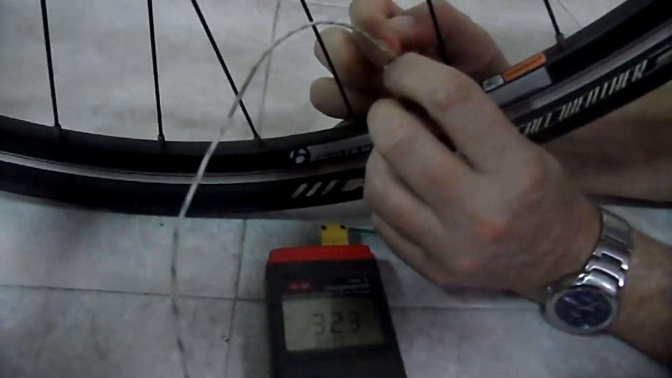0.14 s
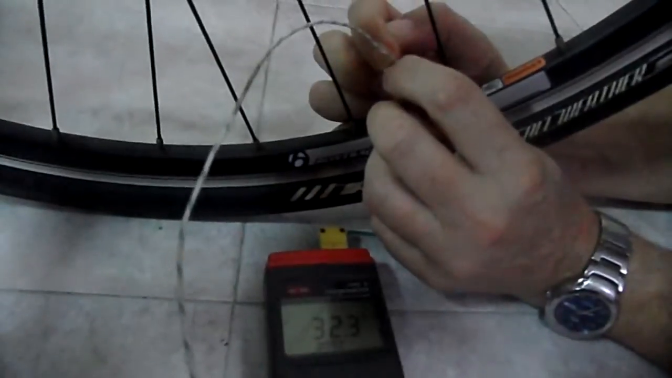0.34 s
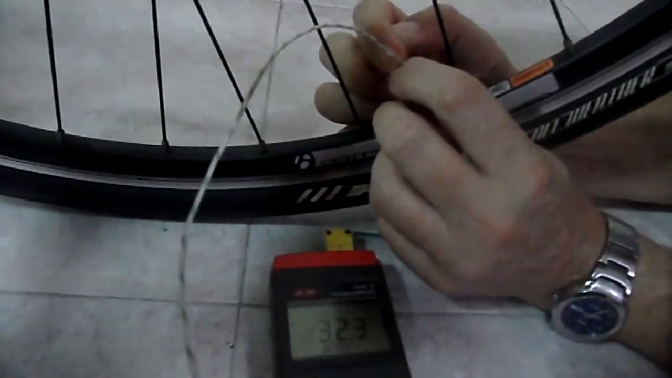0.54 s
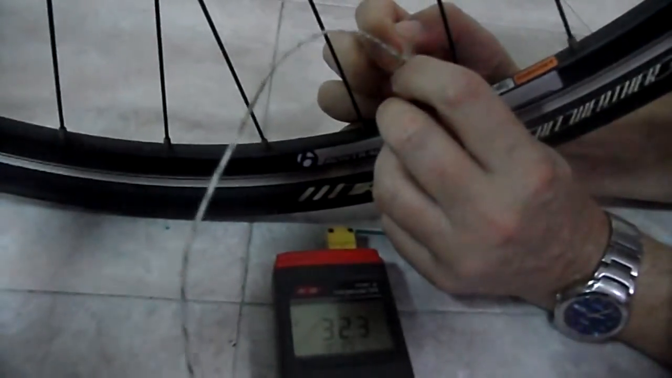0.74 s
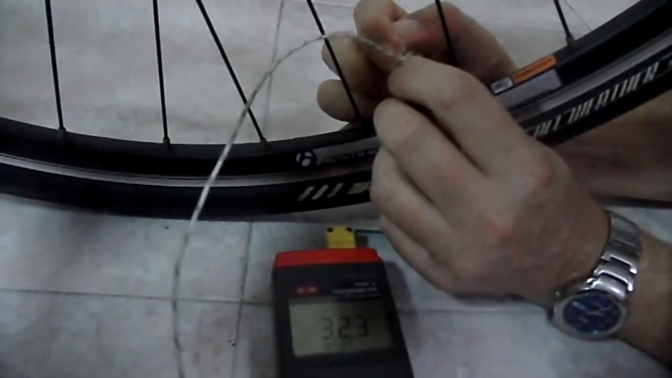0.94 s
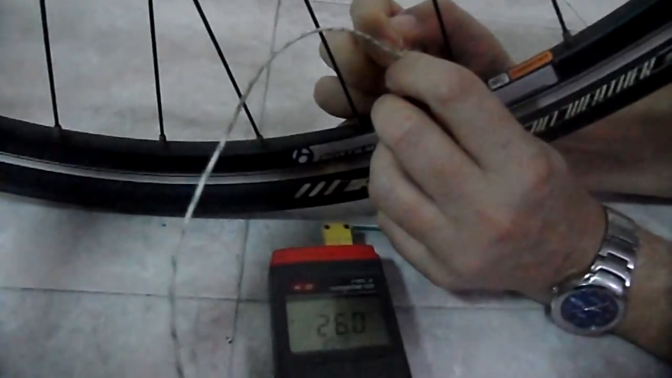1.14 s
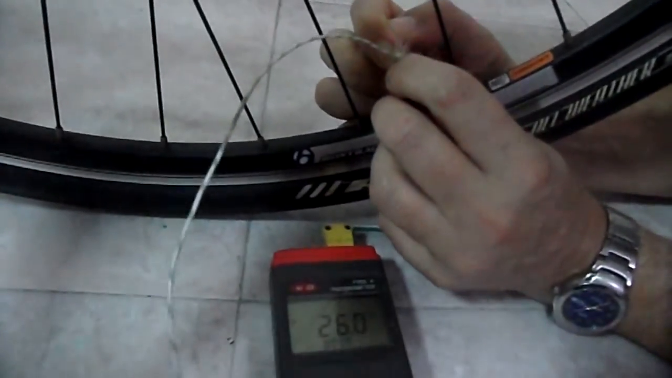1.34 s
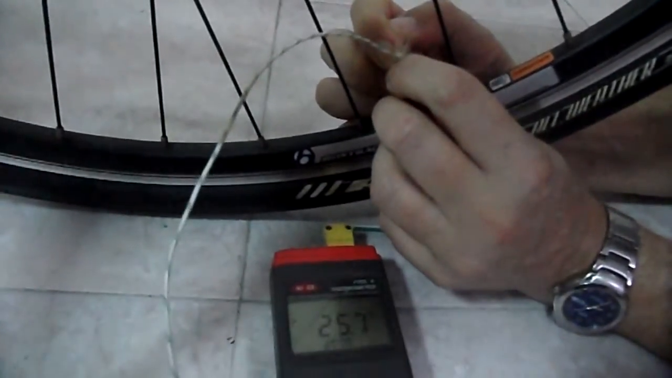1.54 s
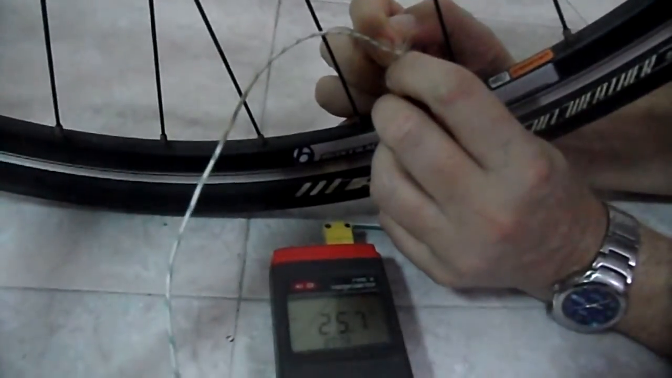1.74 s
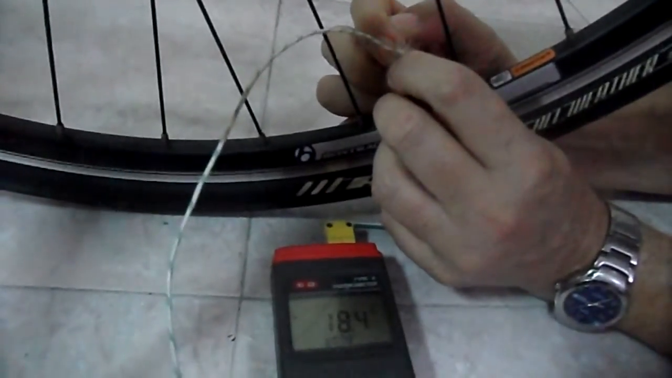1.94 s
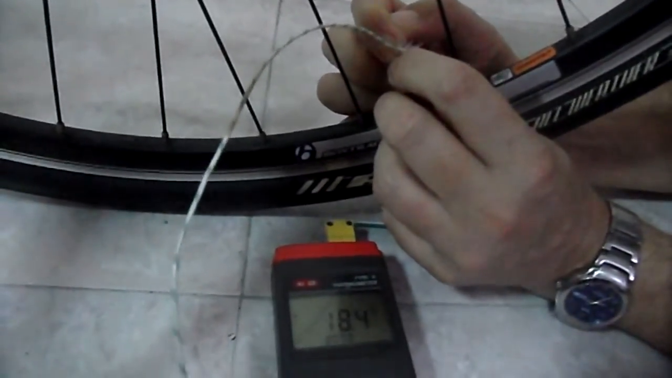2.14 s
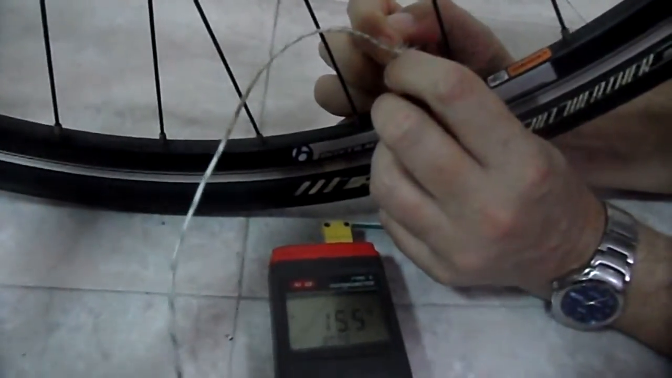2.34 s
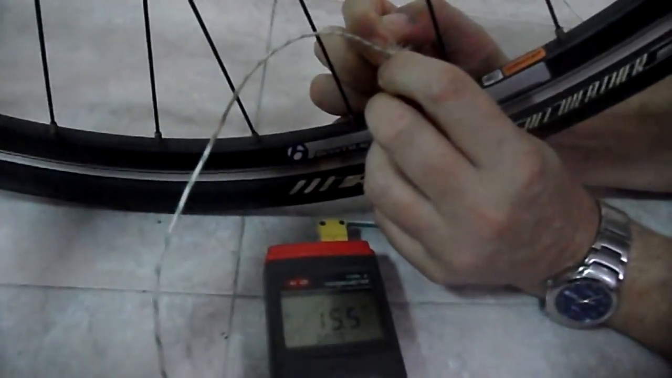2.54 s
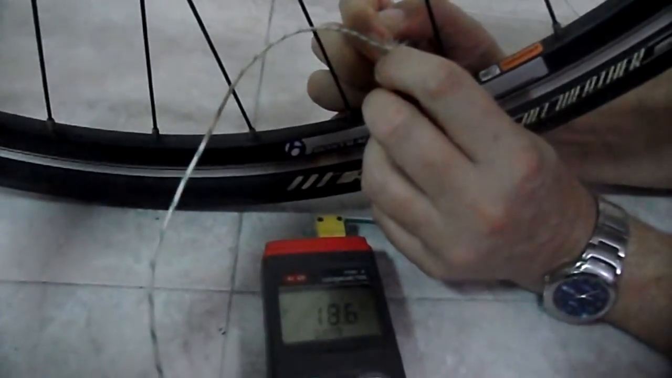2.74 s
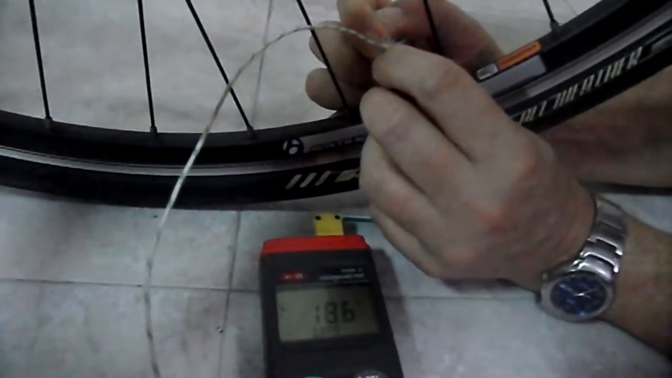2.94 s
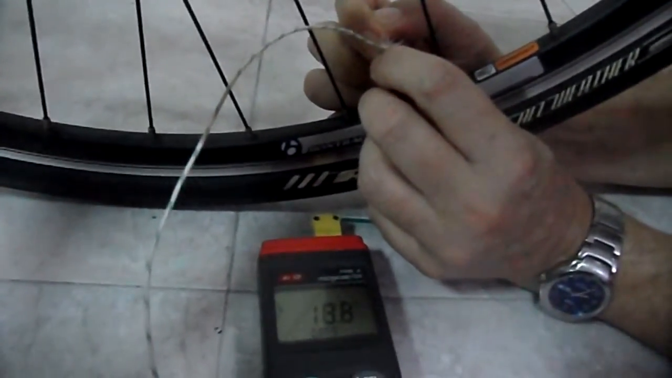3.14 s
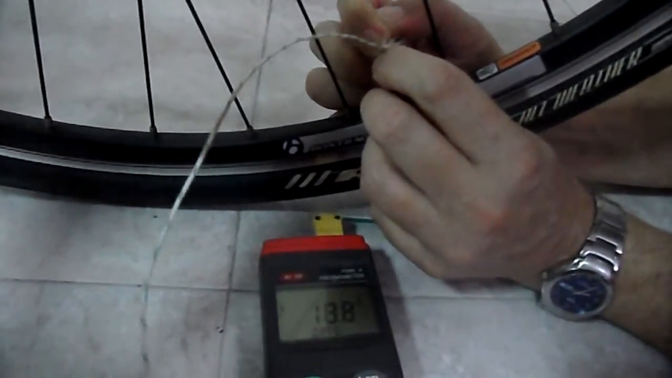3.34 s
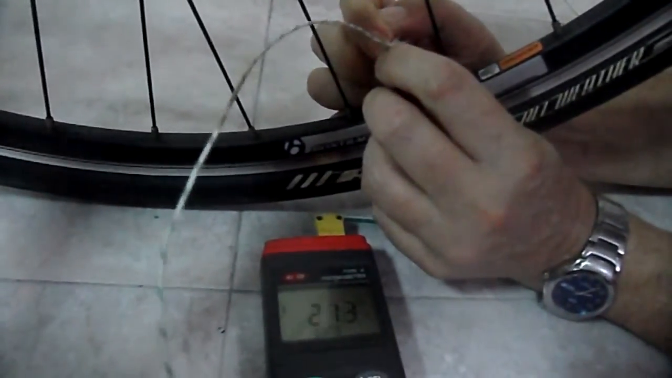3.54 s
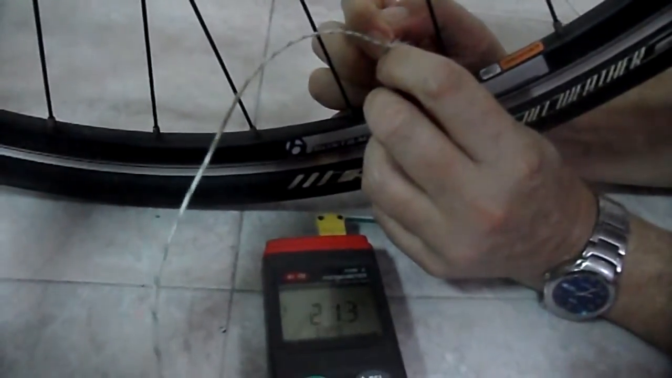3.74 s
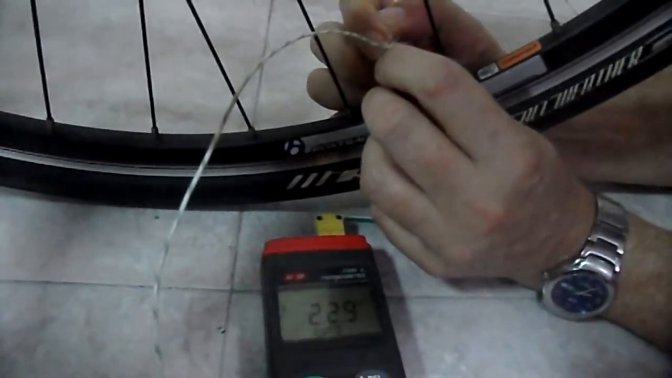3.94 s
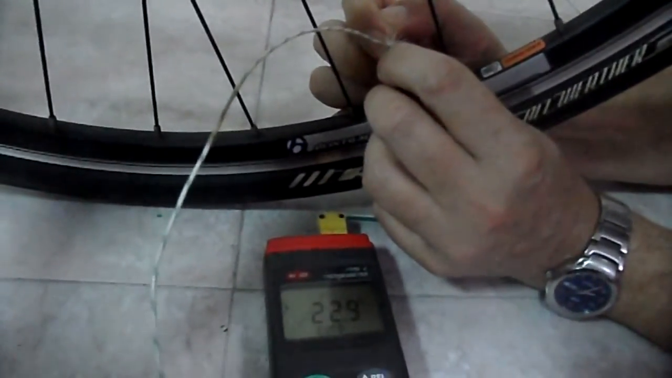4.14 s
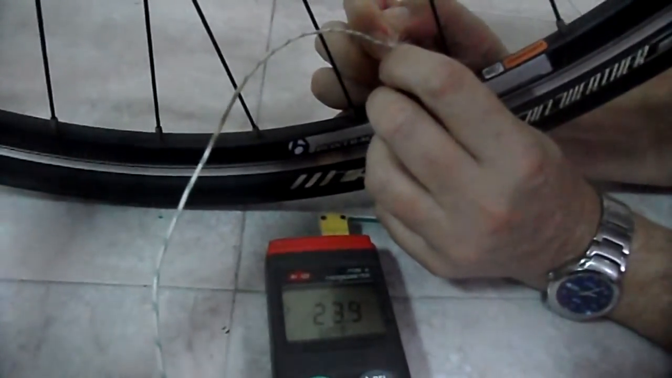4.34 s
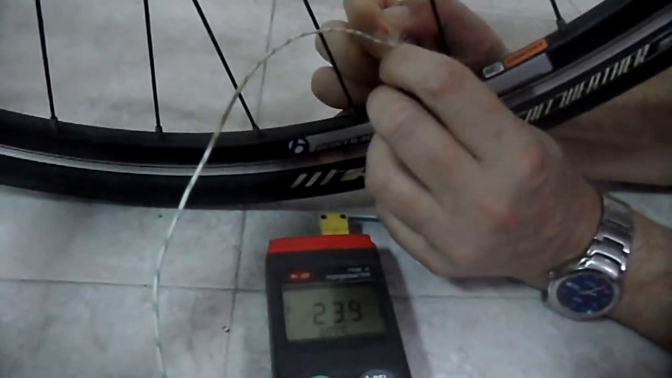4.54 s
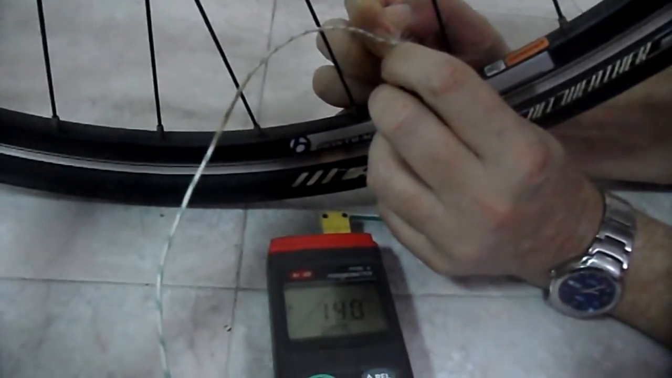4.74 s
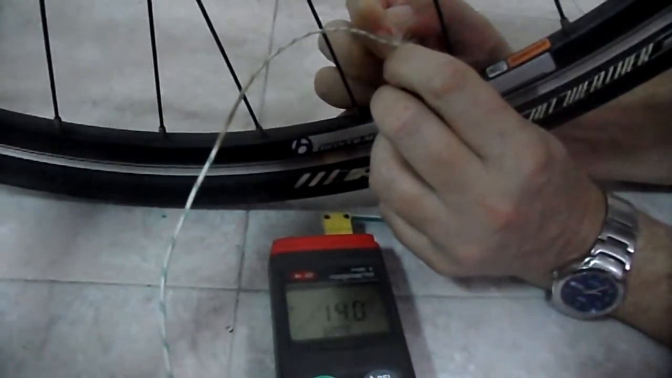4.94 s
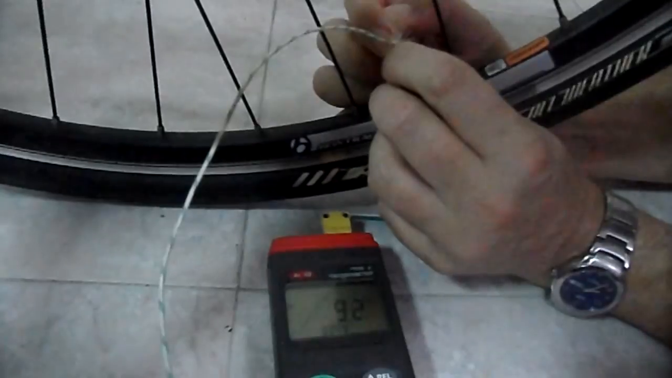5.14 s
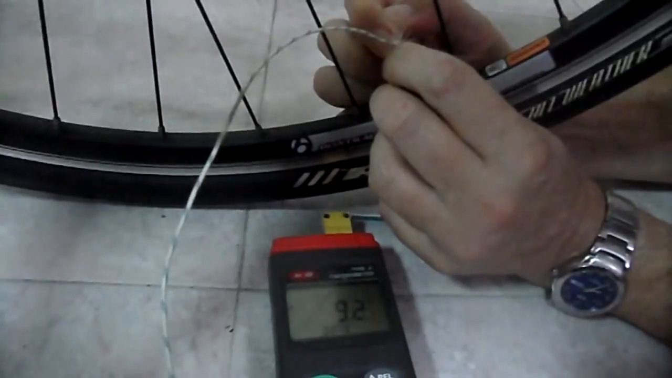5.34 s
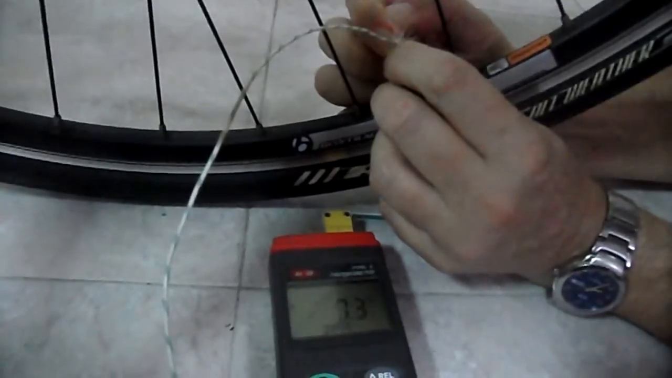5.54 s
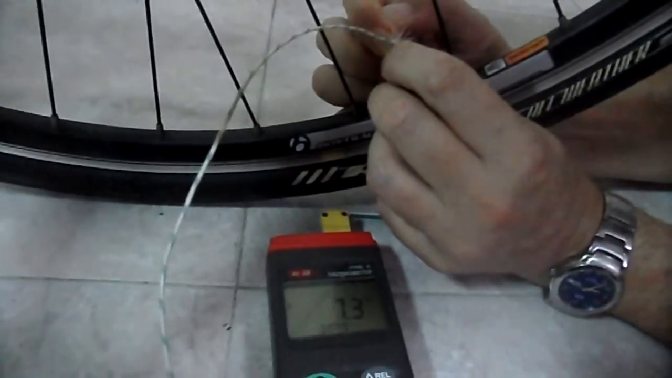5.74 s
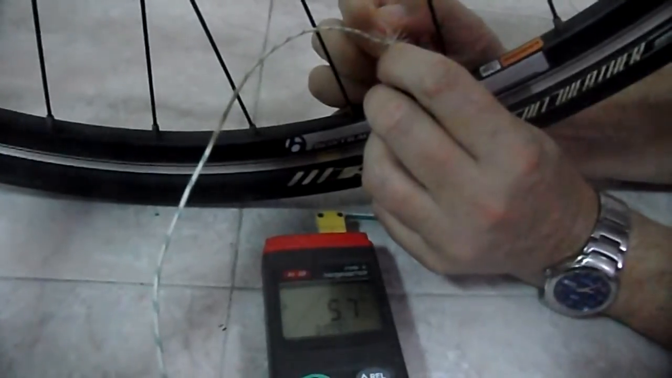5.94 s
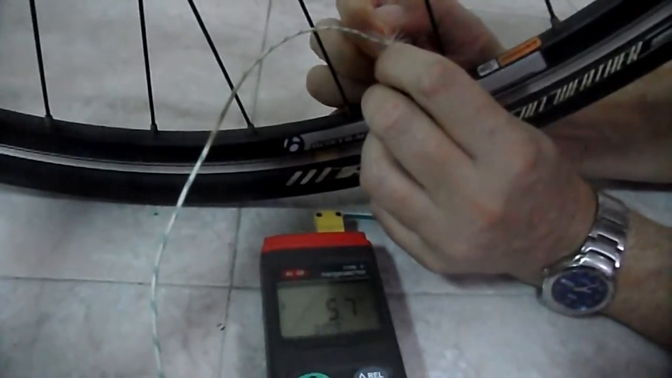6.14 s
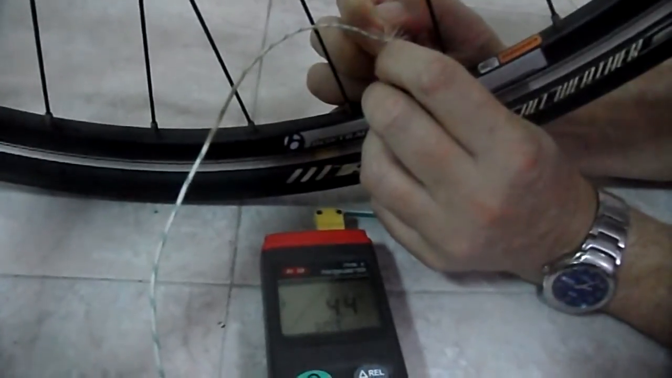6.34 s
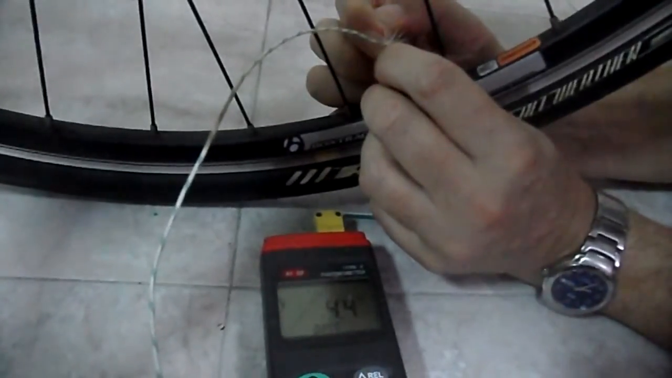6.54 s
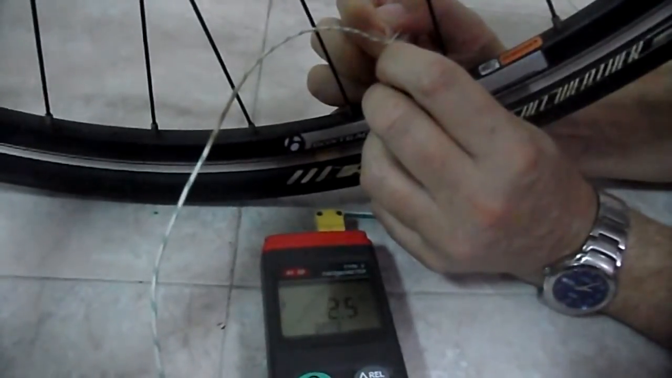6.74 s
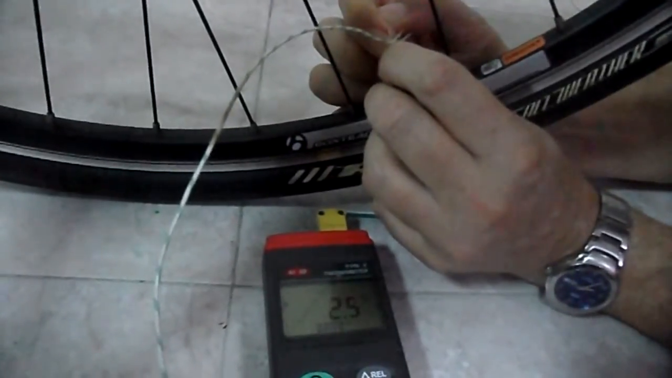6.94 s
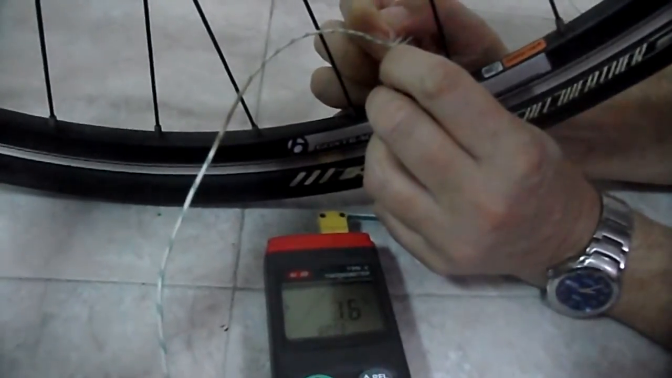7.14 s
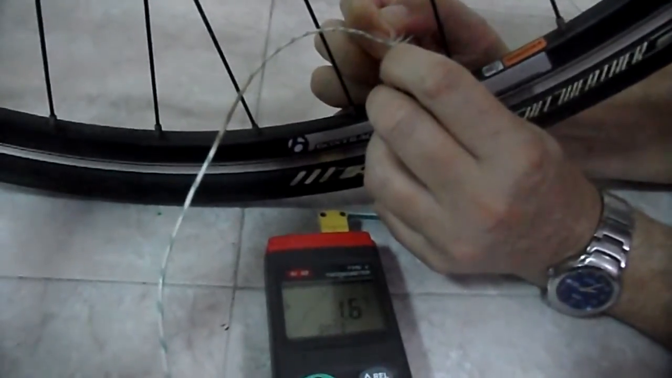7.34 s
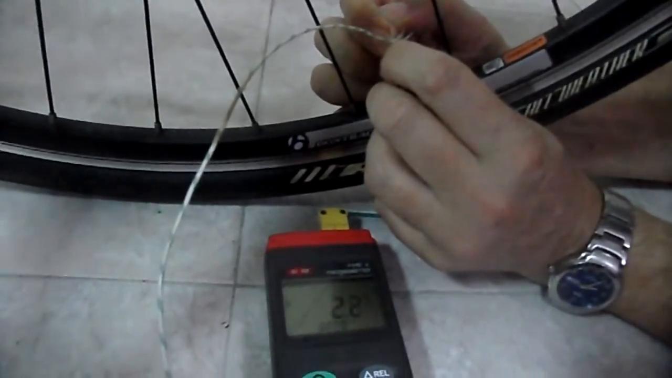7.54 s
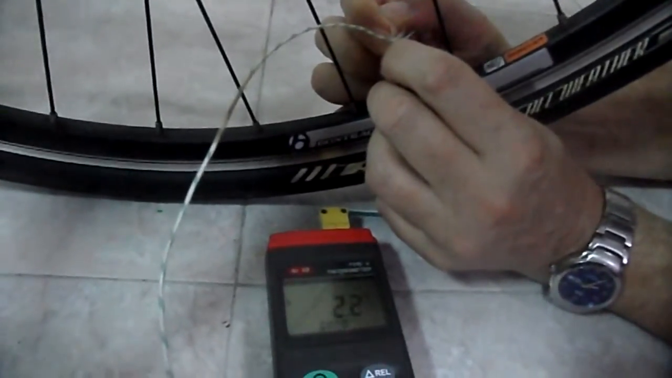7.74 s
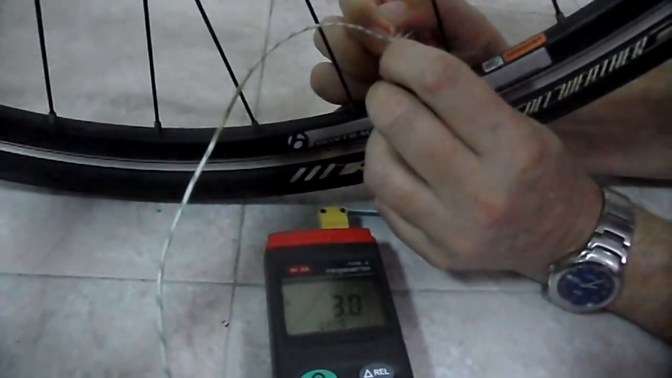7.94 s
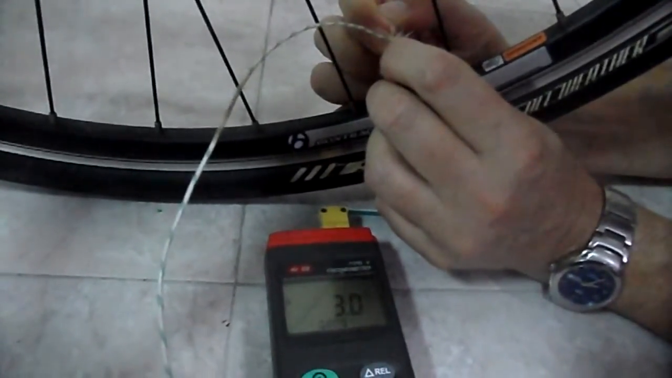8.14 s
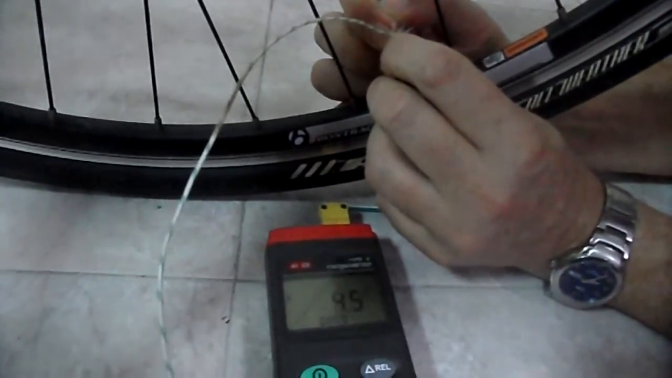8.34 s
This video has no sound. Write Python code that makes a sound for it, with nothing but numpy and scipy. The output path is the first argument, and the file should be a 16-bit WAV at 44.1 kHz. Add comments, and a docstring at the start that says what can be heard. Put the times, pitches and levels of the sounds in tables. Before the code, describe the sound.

A soft rumble, a low machine hum and a deep drone fill a tiled room, with very faint whines and a few tiny fingertip ticks on a bicycle tyre's valve stem. At about 0.8 seconds the valve pops open with a sharp, brief hiss, and air thumps against the close microphone around 1 second. A second bright hiss runs from 1.2 to 2 seconds, with low buffeting near its end. A shorter, quieter one follows from 2.5 to 2.9 seconds. Each leaves a short echo. Fingertips tick faintly at 3.3 and 4 seconds. At 4.1 seconds the valve pops again and a long, slightly fluttering hiss begins. It thins a little around 5.6 seconds and gradually weakens from about 6.8, still going at the end, around 8.4 seconds. Soft puffs hit the microphone near 7.2 and 7.8 seconds. The overall volume dips at loud bursts and creeps back.

```python
"""Air hisses out of a bicycle tyre's valve: three short presses by hand, then a long one.
The jet rushes between the fingers, weakens as the tyre empties, and now and then buffets the
microphone. The valve pops as it snaps open, and fingertips tick on its stem. Behind it are the
echo of a tiled room, a humming machine, a deep drone and faint whines. The camera's automatic
volume control turns everything down at each loud burst, then slowly back up."""
import sys
import numpy as np
from scipy import signal
from scipy.fft import rfft, irfft
from scipy.io import wavfile

SR = 44100
rng = np.random.default_rng(int(sys.argv[2]) if len(sys.argv) > 2 else 0)


def persist_wave(psi):
    """Save psi, clipped to +-1, as 16-bit WAV."""
    counts = np.round(np.clip(psi, -1, 1) * 32767).astype(np.int16)
    wavfile.write(sys.argv[1], SR, np.atleast_2d(counts).T)


N = 373968
TIME = np.arange(N) / SR
FREQS = np.fft.rfftfreq(N, 1 / SR)


# the overall tone of the hiss (frequency [Hz], level [dB])
HISS_TONE = [(100, -25.5), (400, -25.5), (1050, -23.5), (2400, -16.5), (4000, -13.5), (6000, -9.5),
             (9000, -3.5), (12000, 0.5), (14200, 0.14)]
# pitches boosted by the hollows of the valve, cupped hand and microphone openings
# (frequency [Hz], width [Hz], left boost [dB], right boost [dB])
HOLLOWS = [(1600, 360, 9.1, 9.0), (1980, 200, 4.3, 4.4), (2990, 500, 5.8, 5.8), (3410, 450, 9.4, 9.4),
           (4250, 270, 5.8, 5.8), (4740, 320, 5.0, 5.1), (5630, 110, 2.7, 0.5), (6300, 240, 4.7, 2.0),
           (7040, 220, 3.0, 3.6), (7510, 430, 6.4, 5.6), (7950, 160, 3.3, 3.4), (8530, 430, 3.9, 2.4),
           (9420, 260, -1.0, 2.9), (9800, 300, 4.1, 2.2), (10300, 390, 2.3, 2.2), (11130, 650, 2.4, 5.8),
           (11690, 600, 4.9, 6.2), (12300, 420, 4.8, 1.1), (13090, 540, 4.7, 5.6), (13550, 540, 4.9, -2.7)]

def air_jet(level_db=0.5, flutter_db=0.76, sputter_db=0.5, roar_hz=3000, fizz_hz=9500):
    """Swirling air hisses, brighter the faster it flows. Gives the close sound and the room's share."""
    flow, roar_db = valve_flow()
    boost_db = sum(np.array([[left], [right]]) / 2 ** ((2 * (FREQS - hz) / width) ** 2)
                   for hz, width, left, right in HOLLOWS)
    near = stereo_noise(gain_of(curve_at(HISS_TONE, FREQS) + boost_db), likeness=0.93)
    far = normalised(filtered(near, gain_of(-0.59 * boost_db)))  # over all directions the boosts even out
    hiss = np.array([near, far])
    roar = filtered(hiss, 1 / (1 + (FREQS / roar_hz) ** 8))
    fizz = filtered(hiss, 1 - 1 / (1 + (FREQS / fizz_hz) ** 8))
    middle = hiss - roar - fizz
    brightness = np.maximum(flow / gain_of(-11), 0.2) ** 0.25
    lower = (middle + roar * gain_of(roar_db)) / brightness
    upper = fizz * brightness ** 0.5 * gain_of(-0.17 * roar_db)  # air roaring on the fingers loses fizz
    flicker_db = flutter_db * wander(11) + sputter_db * wander(250)
    return (lower + upper) * flow * gain_of(level_db + flicker_db)


# presses on the valve; the second row is already shut when it starts, so it adds no burst
# (start [s], opening time [s], let go at [s], closing time [s], level [dB], dip [dB], roar [dB])
VALVE_PRESSES = [(.772, 0.0076, 0.83, 0.096, -8, -2, 0), (.955, 0.018, 0.85, .04, -47, 0, 3),
                 (1.236, 0.087, 1.9874, .06, -10.5, 2, -1), (2.504, 0.013, 2.803, 0.11, -18.5, 0, -4.5),
                 (4.1127, 0.0042, 11, .06, -8.5, 2, 0.77)]

def valve_flow(surge_db=3.5, surge_s=0.04, dip_at_s=0.2, firm_for_s=2.66, sag_db_per_s=4):
    """Each press lets air out and the tyre goes soft. Gives the flow and the roar on the fingers."""
    flow, roar_db, open_s = np.zeros((3, N))
    for start, opening, let_go, closing, db, dip_db, press_roar_db in VALVE_PRESSES:
        age = np.maximum(TIME - start, 0)
        crack = np.minimum(age / 0.0015, 1)  # the valve jumps part-way open at once
        gap = crack * np.minimum(0.19 + age / opening, 1)
        surge = np.exp(-age / surge_s)  # the air just behind it rushes out first
        dip = (age / dip_at_s * np.exp(1 - age / dip_at_s)) ** 2  # the finger gives, then presses again
        shut_db = 20 * np.clip((TIME - let_go) / closing, 0, 2) ** 3.2  # once let go, it shuts ever faster
        flow += gap * gain_of(db + surge_db * surge - dip_db * dip - shut_db)
        roar_db = np.where(age > 0, press_roar_db, roar_db)
        open_s += np.minimum(age, let_go - start)
    sag_db = sag_db_per_s * np.maximum(open_s - firm_for_s, 0)
    shift_db = -2.5 * np.clip((TIME - 5.56) / 0.097, 0, 1)  # the fingers move out of the jet
    return flow * gain_of(-sag_db), roar_db + shift_db


# kicks of air from the valve (time [s], kick level [dB], kick length [s], pop level [dB])
VALVE_KICKS = [(0.7734, -16, 0.0058, -23.5), (4.111, -15.5, 0.0033, -26.5)]

def valve_kicks(pop_hz=800, pop_decay_s=0.0065):
    """The valve snaps open: the air pressure swings once and rebounds, with a short rough pop."""
    out = np.zeros((2, N))
    pop = stereo_noise(FREQS / (FREQS + 200) / (1 + (FREQS / pop_hz) ** 2), likeness=0.82)
    for start, db, length, pop_db in VALVE_KICKS:
        age = np.maximum(TIME - start, 0)
        out -= gain_of(db) * np.sin(np.pi * age / length) * np.exp(-(age / length) ** 2 / 1.5)
        out += gain_of(pop_db) * pop * np.minimum(age / 0.0018, 1) * np.exp(-age / pop_decay_s)
    return out


# puffs of air (middle [s], level [dB], half length [s], treble cut-off [Hz], left minus right [dB])
AIR_PUFFS = [(0.779, -35, .009, 170, -7), (0.91, -8, 0.022, 30, -3), (0.96, -16.5, .012, 140, -8),
             (1, -21, .039, 55, -3), (1.78, -32, 0.11, 49.4, -3.5), (1.9, -30.5, 0.032, 120, 1),
             (1.98, -27.5, 0.029, 100, 1), (2.06, -27.5, 0.11, 45.3, -3), (4.122, -21.5, .007, 120, 3),
             (7.19, -28, .08, 49, 2), (7.805, -20.5, 0.015, 121, 18), (7.865, -27.5, .03, 131, 6)]

def air_puffs(steepness=3.2):
    """Escaping air buffets the microphone in short, low rumbles, partly different on each side."""
    out = np.zeros((2, N))
    swirl = stereo_noise(FREQS / (FREQS + 15), likeness=0.23)
    hz = np.fft.rfftfreq(SR, 1 / SR)
    for middle, db, length, cutoff_hz, pan_db in AIR_PUFFS:
        span = slice(round(middle * SR) - SR // 2, round(middle * SR) + SR // 2)
        swell = np.exp(-((TIME[span] - middle) / length) ** 2)
        rumble = irfft(rfft(swirl[:, span]) / (1 + (hz / cutoff_hz) ** steepness))
        puff = normalised(swell * rumble) * np.sqrt(np.mean(swell ** 2))
        out[:, span] += gain_of([[db + pan_db / 2], [db - pan_db / 2]]) * puff
    return out


# fingertips touch the valve stem (time [s], level [dB])
FINGER_TICKS = [(.09, -58), (.258, -56), (.448, -60), (.538, -60), (3.33, -54.5), (3.976, -46.5)]
# the notes the stem rings with (frequency [Hz], level [dB], time to fade by 60 dB [s])
STEM_NOTES = [(1800, -1.5, .006), (2430, -8.5, 0.005), (3450, 3.5, .016), (4840, 4, 0.0064)]

def finger_ticks(scrape_s=0.0028):
    """Tiny scrapes of a fingertip make the valve stem ring briefly."""
    t = np.arange(SR // 10) / SR
    ring = sum(gain_of(db - 60 * t / fade_s) * np.sin(2 * np.pi * hz * t) for hz, db, fade_s in STEM_NOTES)
    out = np.zeros(N)
    for start, db in FINGER_TICKS:
        scrape = rng.standard_normal(len(t)) * np.exp(-t / scrape_s)
        tick = signal.fftconvolve(scrape, ring)
        out[round(start * SR):][:len(tick)] += gain_of(db) * tick / abs(tick).max()
    return out


# how long the tiled room echoes (frequency [Hz], time to fade by 60 dB [s])
ECHO_TIMES = [(300, 0.36), (1500, 0.61), (4000, .49), (10000, 0.37), (14000, 0.34)]
# how much the gap between left and right is widened or narrowed (frequency [Hz], boost [dB])
STEREO_WIDTH = [(100, -3.5), (900, -36.5), (2500, -52), (4700, -51.5), (5800, 5.5), (8000, -0.5),
                (11000, 6), (14000, 2)]

def room_echo(near, far, early_db=-17, tail_db=-12):
    """Sound bounces quickly off the floor and wheel rim, then dies away around the room."""
    hz, t, spectrum = signal.stft(rng.standard_normal((2, SR * 2 // 3)), SR, nperseg=256)
    fade = gain_of(-60 * t / curve_at(ECHO_TIMES, hz)[:, None])
    tail = signal.istft(spectrum * fade, SR, nperseg=256)[1]
    delay = np.arange(tail.shape[1]) / SR
    tail *= np.clip(delay / 0.01, 0, 1)
    early = rng.standard_normal(len(delay)) * (delay > 0.003) * np.exp(-delay / 0.0069)
    echo = gain_of(tail_db) * tail / np.linalg.norm(tail[0])
    echo += gain_of(early_db) * early / np.linalg.norm(early)
    left, right = near + signal.fftconvolve(far, echo, axes=1)[:, :N]
    centre = (left + right) / 2
    side = filtered((left - right) / 2, gain_of(curve_at(STEREO_WIDTH, FREQS)))
    return np.array([centre + side, centre - side])


# the tone of the room's steady noise (frequency [Hz], level [dB])
NOISE_TONE = [(20, 4), (35, 6), (55, 6), (80, 2), (110, -4.5), (200, -10.5), (400, -21), (680, -19),
              (900, -25), (1500, -28.5), (2400, -32), (4000, -38.5), (7000, -43), (14000, -41.5)]
# how alike that noise is on the two sides (frequency [Hz], likeness [0-1])
NOISE_LIKENESS = [(40, 0.99), (130, 0.99), (300, 0.92), (700, 0.99), (2000, 0.93), (5000, 0.5), (14000, 0)]
# which side it leans to (frequency [Hz], left minus right [dB])
NOISE_PAN = [(30, 2), (120, -1), (300, 2.5), (700, 0)]

def room_noise(level_db=-42, flutter_db=1.5, flutter_above_hz=1200):
    """A steady, soft rumble whose treble flickers."""
    tone_db = curve_at(NOISE_TONE, FREQS) + np.array([[0.5], [-0.5]]) * curve_at(NOISE_PAN, FREQS)
    noise = gain_of(level_db) * stereo_noise(gain_of(tone_db), curve_at(NOISE_LIKENESS, FREQS))
    treble = filtered(noise, FREQS ** 2 / (FREQS ** 2 + flutter_above_hz ** 2))
    return noise + treble * (gain_of(flutter_db * wander(35)) - 1)


# the tones of the humming machine (frequency [Hz], level [dB])
HUM_TONES = [(64.6, -46), (129.2, -56), (387.6, -71), (452.2, -83), (678.3, -71)]

def machine_hum(waver=0.12):
    """A machine hums with a low note and a few overtones, each wavering slightly."""
    return sum(gain_of(db) * np.sin(2 * np.pi * hz * TIME + waver * wander(8)) for hz, db in HUM_TONES)


def deep_drone(hz=53.3, loud_db=-44.5, rest_db=-51.5, rise_s=0.17, hold_until_s=0.75, fade_s=0.4):
    """A deep tone swells, holds, then sinks to a faint steady level."""
    held = np.exp(-np.maximum(TIME - hold_until_s, 0) / fade_s)
    level = np.minimum(TIME / rise_s, 1) * gain_of(rest_db + (loud_db - rest_db) * held)
    return level * np.sin(2 * np.pi * hz * TIME + 0.29 * wander(6))


# thin whines in the background (frequency [Hz], width [Hz], level [dB])
FAINT_WHINES = [(642, 40, -72), (2470, 120, -84), (9620, 300, -87)]

def whines():
    """Narrow bands of noise that sound like faint steady tones."""
    return sum(gain_of(db) * stereo_noise(1 / (1 + (2 * (FREQS - hz) / width) ** 2), likeness=1)
               for hz, width, db in FAINT_WHINES)


def gain_of(db):
    """Turns decibels into a number to multiply a sound by."""
    return 10 ** (np.asarray(db) / 20)


def normalised(x):
    """Scales a signal to an average strength (rms) of 1."""
    return x / np.sqrt(np.mean(x ** 2) + 1e-20)


def curve_at(points, hz):
    """Reads between the rows of a table, with frequencies spaced like musical pitch."""
    frequencies, values = np.transpose(points)
    return np.interp(np.log(hz + 1), np.log(frequencies + 1), values)


def filtered(x, gain):
    """Turns each frequency up or down by its own gain."""
    return irfft(rfft(x) * gain, N)


def stereo_noise(gain, likeness):
    """Noise shaped by a gain per frequency; at likeness 1, left and right are the same."""
    real, imaginary = rng.standard_normal((2, 2, len(FREQS)))
    centre, side = real + 1j * imaginary
    centre, side = centre * np.sqrt(1 + likeness), side * np.sqrt(1 - likeness)
    return normalised(irfft(np.array([centre + side, centre - side]) * gain, N))


def wander(rate_hz):
    """A smooth random wobble, up to about the given rate."""
    return normalised(filtered(rng.standard_normal(N), np.exp(-(FREQS / rate_hz) ** 2)))


def scene():
    """The valve in its room, the air on the microphone and the background."""
    near, far = air_jet() + finger_ticks()
    tyre = room_echo(near, far) + valve_kicks() + air_puffs()
    hum_gain = np.sqrt(2) * gain_of([[1.5], [-1.5]])  # louder on the left
    return tyre + room_noise() + hum_gain * (machine_hum() + deep_drone()) + whines()


def record(dry, threshold_db=-22, squeeze=0.55, recovery_db_per_s=2, cutoff_hz=14220):
    """The volume control drops at once on loud sounds and creeps back; the highest treble is cut off."""
    power = signal.lfilter([1], [1, -np.exp(-1 / (0.0039 * SR))], (dry ** 2).mean(0)) / (0.0065 * SR)
    needed_db = np.maximum(10 * np.log10(power + 1e-12) - threshold_db, 0) * squeeze
    recovery_db = recovery_db_per_s * TIME
    drop_db = np.maximum.accumulate(needed_db + recovery_db) - recovery_db
    low_pass = signal.firwin(801, cutoff_hz, window=("kaiser", 8), fs=SR)
    return signal.oaconvolve(dry * gain_of(-drop_db), low_pass[None], "same", axes=1)


dry = scene()
out = record(dry)
persist_wave(out)
```